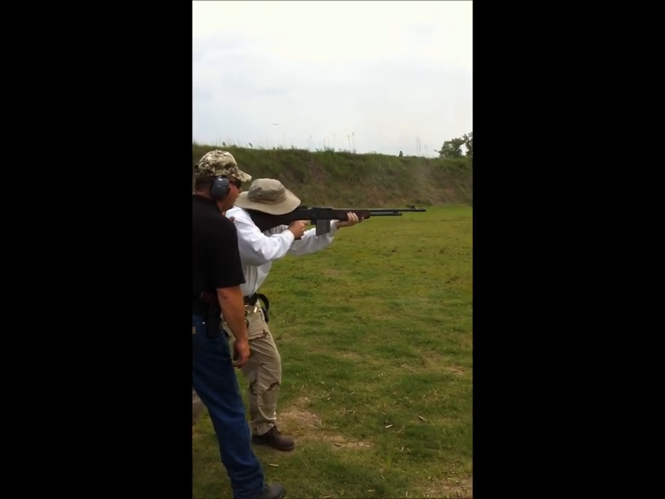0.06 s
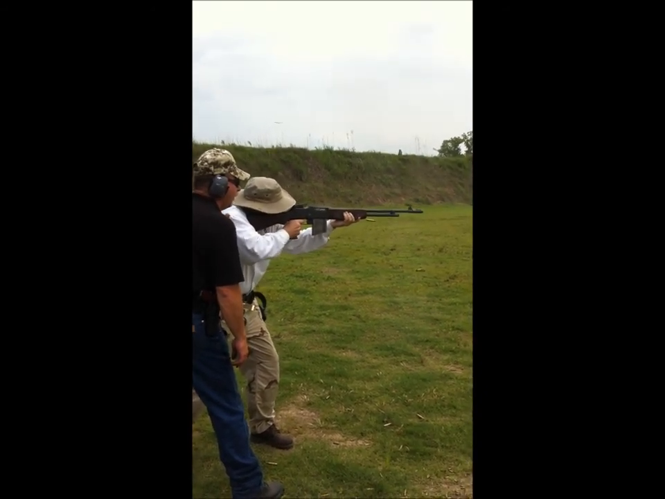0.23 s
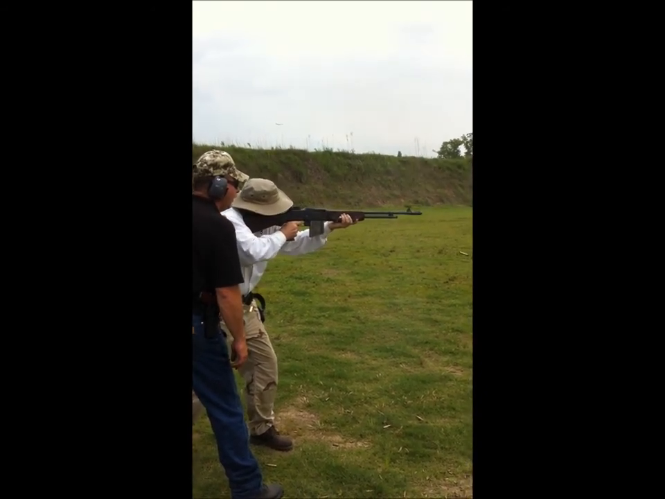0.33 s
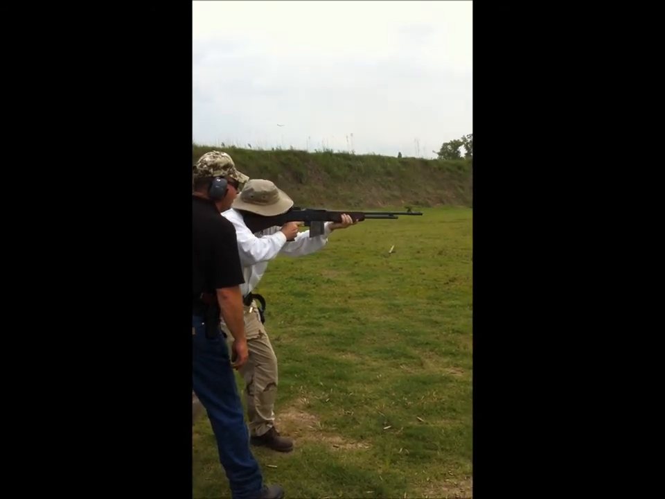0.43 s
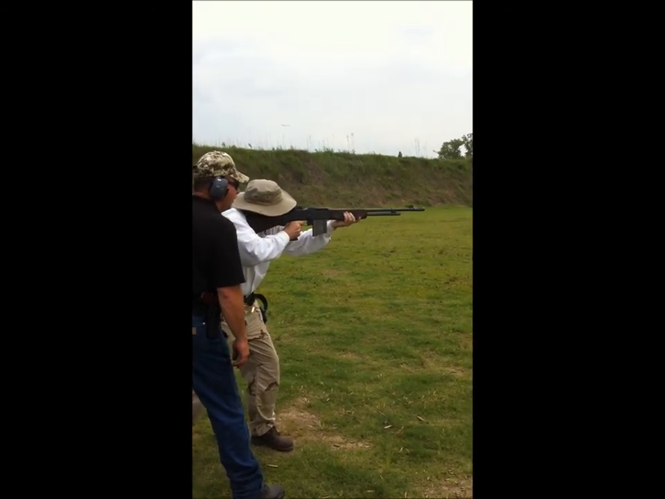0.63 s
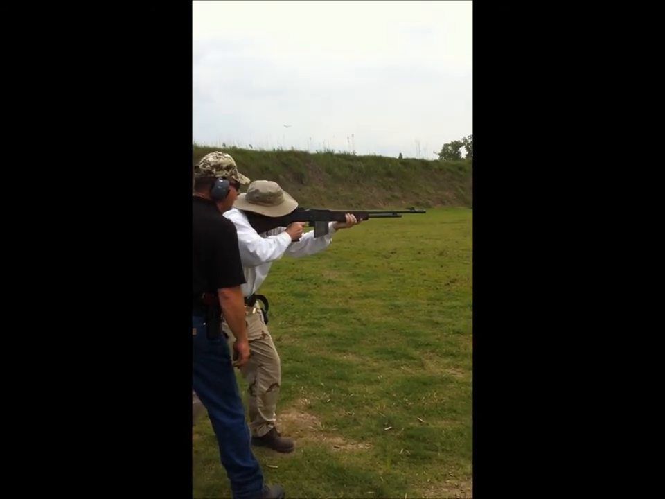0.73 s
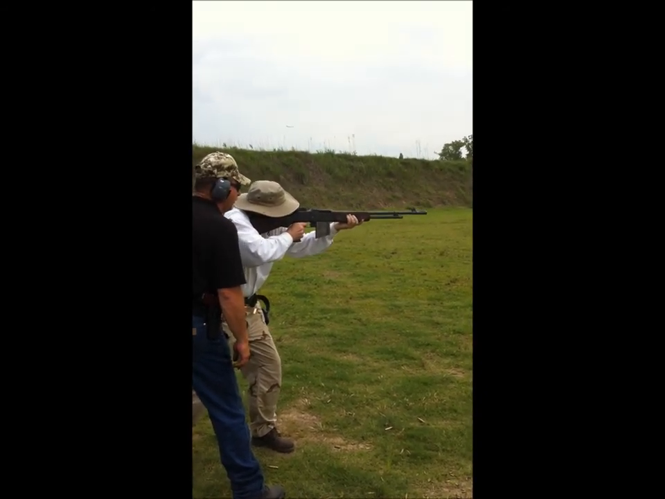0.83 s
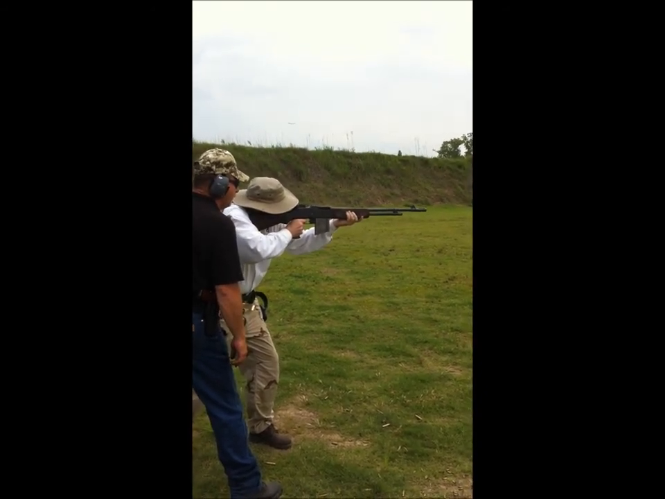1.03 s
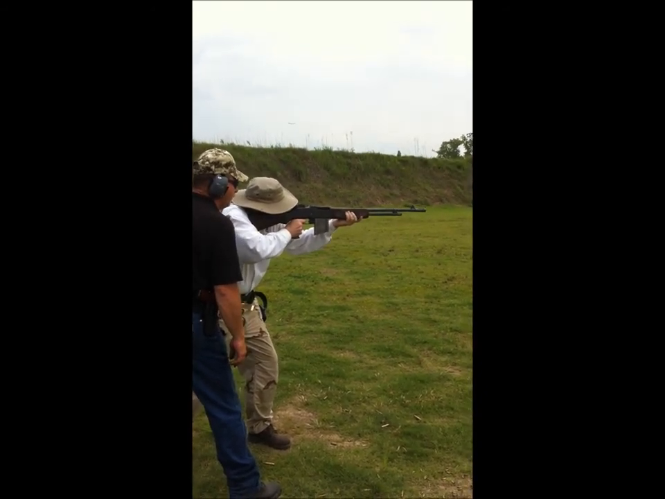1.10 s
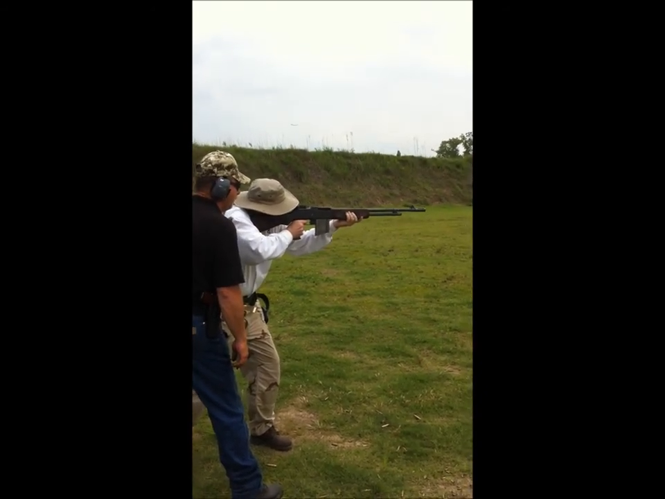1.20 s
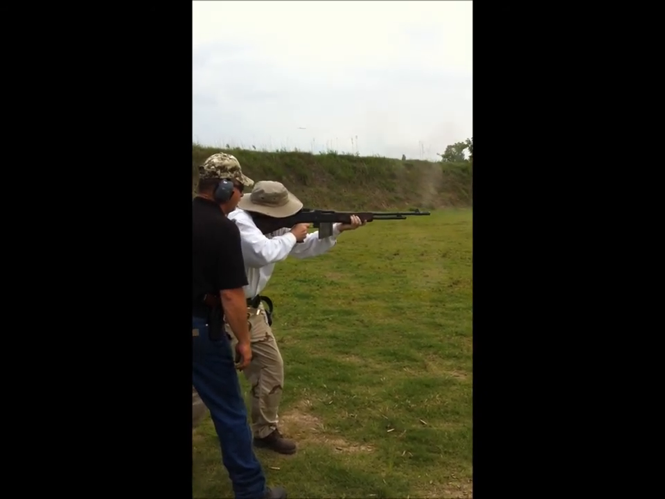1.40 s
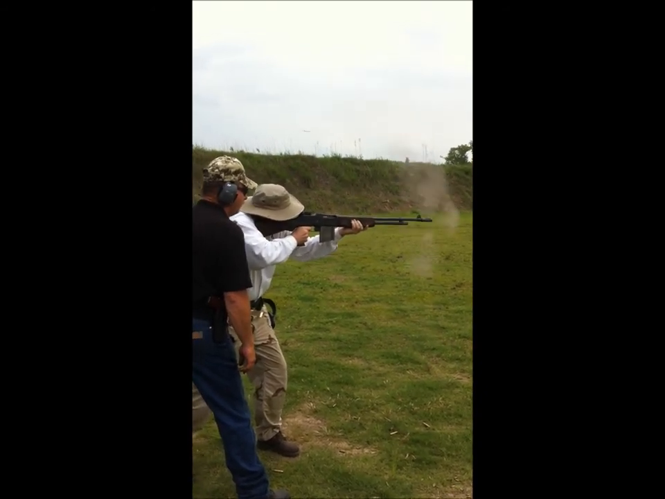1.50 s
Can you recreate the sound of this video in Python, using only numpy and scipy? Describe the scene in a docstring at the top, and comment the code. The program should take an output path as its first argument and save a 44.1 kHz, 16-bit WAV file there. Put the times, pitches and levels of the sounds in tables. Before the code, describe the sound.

Three-round burst of automatic rifle fire close by, echoing off earth berms on open grass

```python
"""Three hard rifle blasts in a quick burst on an open grass range closed by earth berms, a few metres away, in mono.
The action rattles first; close echoes and rough scatter trail every blast, and far echoes roll in late and dull.
Near the end a spent case rings and the action moves again, over a faint unsteady floor of air.
Blasts, echoes and thuds are decaying swings, rattles and knocks are dying bands of noise, the case is two
beating sines, and the scatter is grains, hiss and rumble. A fast limiter ducks whatever is too loud."""
import sys
import numpy as np
from scipy import signal
from scipy.fft import rfft, irfft
from scipy.io import wavfile

SR = 44100
rng = np.random.default_rng(int(sys.argv[2]) if len(sys.argv) > 2 else 0)


def gain_from_decibels(decibels):
    """Convert decibel values to linear amplitude factors."""
    exponent = np.asarray(decibels, float) / 20
    return 10 ** exponent


def bounce(signal):
    """Save signal as a 16-bit WAV file at the path given by the first command-line argument."""
    frames = np.transpose(np.atleast_2d(signal))
    limited = np.clip(frames, -1, 1)
    pcm = np.round(limited * 32767).astype(np.int16)
    wavfile.write(sys.argv[1], SR, pcm)


N = 68355
T = np.arange(N) / SR   # seconds
FLICKER_DB = 3   # spread of the chance swings in level

# All levels are those ahead of the limiter.
# Spectrum of the air floor. Each row: frequency in Hz, relative level in dB per Hz.
AIR_SPECTRUM = [(18, -73), (30, -30), (183, -1), (301, -7.5), (423, -18), (610, -6), (952, -12),
                (1060, -15.5), (2860, -20), (15700, -38)]
# Rough scatter from ground and berms after every shot.
# Each row: delay in seconds, dull grains in dB, bright hiss in dB, rumble in dB.
SCATTER = [(.012, -27, -34, -52), (.02, -18.5, -22, -37), (.031, -11, -16, -29), (.042, -15, -19.5, -21),
           (.05, -26.5, -23.5, -37), (.065, -22, -25.5, -31), (.08, -16.5, -18.5, -29.5),
           (.1, -25, -23.5, -26), (.17, -31.5, -26.5, -33.5), (0.281, -32.5, -27, -28),
           (0.311, -44, -32.5, -33), (.35, -49, -39, -46.5), (.52, -77, -58.5, -49.5),
           (.545, -60, -48, -46), (.56, -69, -43, -50), (.62, -65, -53.5, -52.5), (.67, -72, -54, -50),
           (.69, -57, -45, -63), (.76, -63, -62.5, -63), (1.2, -61, -80, -70.5)]
# Spectrum of the dull grains. Each row: frequency in Hz, relative level in dB per Hz.
DULL_SPECTRUM = [(60, -54), (130, -15), (267, -2), (600, -5), (1210, -7.5), (1880, -10), (2720, -19),
                 (4000, -21), (8000, -65)]
# Spectrum of the bright hiss. Each row: frequency in Hz, relative level in dB per Hz.
BRIGHT_SPECTRUM = [(710, -41), (1200, -2), (1380, -16), (2080, -3.5), (2520, -5), (3090, -5.5),
                   (9670, -7.5), (15700, -11)]
# Low thuds about the range.
# Each row: start in seconds, level in dB before the low-pass, ring in Hz, 60 dB decay in seconds.
THUDS = [(1.328, -34, 147, 0.092), (1.437, -35, 150, 0.059), (1.54, -36, 60, 0.093)]
# Hollow knocks about the range.
# Each row: start in seconds, level in dB (noise rms starts 6 dB lower), centre in Hz, 60 dB decay in seconds.
KNOCKS = [(.19, -26.5, 660, 0.16), (.733, -16, 697, 0.095), (1.131, -29, 760, 0.017),
          (1.137, -36, 700, 0.26)]
# Metal clatter of action and cases.
# Each row: start in seconds, level in dB (noise rms starts 6 dB lower), centre in Hz, 60 dB decay in seconds.
CLATTER = [(0.032, -38, 6900, 0.049), (.162, -22, 5800, 0.12), (.169, -22, 8000, 0.044),
           (0.179, -16.5, 3700, 0.065), (0.199, -8, 10600, 0.0078), (0.2078, -10.5, 6000, .03),
           (.213, -15, 4730, 0.042), (.228, -1, 9100, 0.027), (0.357, -0.5, 1200, 0.0065),
           (.462, -12, 1500, .006), (0.58, -7, 3120, 0.024), (0.6193, 2.5, 5170, 0.006),
           (0.625, -10, 4850, .02), (0.653, -10, 2380, 0.054), (0.671, -11, 2120, 0.048),
           (.688, -19, 2400, 0.065), (1.052, -49, 6000, 0.037), (1.265, -40.5, 7960, 0.054),
           (1.329, -40, 3000, 0.045), (1.41, -45.5, 6000, 0.061), (1.438, -37.5, 2470, 0.03),
           (1.482, -28, 7000, 0.04), (1.507, -34, 4990, 0.037), (1.518, -25, 4750, 0.19),
           (1.536, -17, 5900, 0.092)]
# Modes of the spent case. Each row: frequency in Hz, level in dB before a 1 dB cut, 60 dB decay in seconds.
CASE_MODES = [(9539, -22, .35), (9572, -20, .07)]
# The burst. Each row: blast in seconds, blast level in dB before the low-pass,
# lead of the action's hiss in seconds, hiss level in dB.
SHOTS = [(0.2369, 12, 0.012, -19.5), (0.3468, 10.5, 0.0022, -4.5), (0.4526, 17.5, 0.0018, -10)]
# Distinct echoes of every shot. Each row: delay in seconds, level in dB before the low-pass,
# ring in Hz, 60 dB decay in seconds, direction of the first swing (+1 or -1).
ECHOES = [(0.015, 1.5, 242, 0.014, 1), (0.0349, 3, 440, 0.0061, -1), (0.0383, -4.5, 287, 0.011, 1),
          (0.0417, -12, 404, 0.018, 1), (.27, -16, 205.4, 0.066, 1)]


def rms_one(x):
    """Scale to rms 1."""
    return x / np.sqrt(np.mean(x ** 2) + 1e-20)


def coloured(x, points):
    """Weight the spectrum of x by the points, joined on a log frequency axis; rms 1."""
    hz, db = np.transpose(points)
    f = np.arange(len(x) // 2 + 1) * SR / len(x) + 1
    gain = gain_from_decibels(np.interp(np.log(f), np.log(hz), db))
    return rms_one(irfft(rfft(x) * gain, len(x)))


def filtered(x, order, hz, kind="low"):
    """Butterworth filter."""
    return signal.sosfilt(signal.butter(order, hz, kind, fs=SR, output="sos"), x)


def flicker(per_s):
    """Level swings in dB: chance values drawn per_s times a second, joined by straight lines."""
    values = rng.standard_normal(int(N / SR * 400))   # more than any rate here uses
    return FLICKER_DB * np.interp(T * per_s, np.arange(len(values)), values)


def thump(s, db, hz, t60, cut_hz):
    """A pressure jump that swings back and dies, its edges rounded by a low-pass."""
    t = np.maximum(T - s, 0)
    swing = (T >= s) * np.cos(2 * np.pi * hz * t) * gain_from_decibels(db - 60 * t / t60)
    return filtered(swing, 2, cut_hz)


def burst(s, db, hz, t60, width):
    """Banded noise that starts at once and dies; width is the ratio of band edges to centre."""
    edges = np.clip([hz / width, hz * width], 20, .45 * SR)
    noise = rms_one(filtered(rng.standard_normal(N), 2, edges, "band"))
    return .5 * noise * (T >= s) * gain_from_decibels(db - 60 * np.maximum(T - s, 0) / t60)


def air():
    """Faint coloured noise whose level wavers by chance."""
    return gain_from_decibels(-48.5 + flicker(25.27)) * coloured(rng.standard_normal(N), AIR_SPECTRUM)


def scatter():
    """Many small faces return each blast: shared dull grains, hiss that darkens with distance, rumble."""
    grains_per_s, grain_spread_db = 2500, 4.5
    far_s, far_cut_hz = 0.38, 4240   # returns later than far_s are fully dulled
    delay, dull_db, bright_db, rumble_db = np.transpose(SCATTER)

    def level(db):
        return np.interp(T, delay, db, left=-200)   # silent ahead of the first return

    hits = rng.random(N) < grains_per_s / SR
    size = gain_from_decibels(grain_spread_db * np.minimum(rng.exponential(1, N), 4))
    grains = hits * size * rng.choice([-1, 1], N)
    dull = coloured(grains, DULL_SPECTRUM) * gain_from_decibels(level(dull_db) + flicker(59.7))
    far = np.clip(T / far_s, 0, 1) ** 2
    out = np.zeros(N)
    for s, *_ in SHOTS:
        start = int(s * SR)
        near_hiss = coloured(rng.standard_normal(N), BRIGHT_SPECTRUM)
        far_hiss = filtered(near_hiss, 1, far_cut_hz)
        hiss = (1 - far) * near_hiss + far * far_hiss
        hiss = hiss * gain_from_decibels(level(bright_db) + flicker(151.4))
        rumble = rms_one(filtered(rng.standard_normal(N), 2, (149, 339), "band"))
        rumble = rumble * gain_from_decibels(level(rumble_db))
        out[start:] += (dull + hiss + rumble)[:N - start]
    return out


def thuds():
    """Low blows: short decaying swings with little treble."""
    return sum(thump(*row, cut_hz=610) for row in THUDS)


def knocks():
    """Hollow knocks: noise in a narrow band, dying away."""
    return sum(burst(*row, width=1.194) for row in KNOCKS)


def clatter():
    """Metal parts rattle: wide bands of noise, each starting at once and dying."""
    return sum(burst(*row, width=2.28) for row in CLATTER)


def spent_case():
    """Two close high modes struck once, beating as they ring down."""
    t = np.maximum(T - 1.481, 0)   # struck at 1.481 s
    return sum(gain_from_decibels(-1 + db - 60 * t / t60) * np.sin(2 * np.pi * hz * t) for hz, db, t60 in CASE_MODES)


def action_hiss(s, lead, db):
    """Bright steady noise of the action, cut off as the blast begins."""
    # the spectrum is flat below its fourth point
    return gain_from_decibels(db) * coloured(rng.standard_normal(N), BRIGHT_SPECTRUM[3:]) * (T > s - lead) * (T < s)


def blast(s, db):
    """A pressure jump that swings down first, with a wide burst of hiss."""
    jump = -thump(s, db, hz=250, t60=0.01, cut_hz=2400)
    hiss = burst(s, 3, 4100, 0.02, 5.5)
    return jump + hiss


def sputter(s):
    """Sharp one-sided spikes of chance size just after the blast, slightly smoothed."""
    spikes_per_s, length_s = 720, .0075
    hits = (rng.random(N) < spikes_per_s / SR) * (T > s) * (T < s + length_s)
    return gain_from_decibels(8) * signal.lfilter([1], [1, -.6], hits * rng.random(N))


def midrange_patch(s):
    """A brief patch of midrange noise just ahead of the second echo."""
    start, length_s = s + .0275, 0.0064
    return burst(start, -9, 1640, 1, 1.32) * (T < start + length_s)


def echoes(s):
    """Distinct returns of one blast, each a decaying swing up or down with rounded edges."""
    return sum(swing * thump(s + delay, db, hz, t60, cut_hz=3000) for delay, db, hz, t60, swing in ECHOES)


def shots():
    """Each round: hiss of the action, blast, sputter, a patch of midrange noise, then the echoes."""
    out = np.zeros(N)
    for s, db, lead, hiss_db in SHOTS:
        out += action_hiss(s, lead, hiss_db)
        out += blast(s, db)
        out += sputter(s)
        out += midrange_patch(s)
        out += echoes(s)
    return out


def scene():
    """All sources reach one capsule, carried alike on both channels."""
    mono = air() + scatter() + thuds() + knocks() + clatter() + spent_case() + shots()
    return np.array([mono, mono])


def limiter(x):
    """Gain drops fast where the peaks pass the ceiling, then recovers at a steady rate in dB."""
    ceiling_db, release_db_per_s, attack_s = -0.5, 1498, 0.00024
    over = np.maximum(20 * np.log10(np.abs(x[0]) + 1e-9) - ceiling_db, 0)
    recovery = release_db_per_s * T
    held = np.maximum.accumulate(over + recovery) - recovery
    r = np.exp(-1 / (attack_s * SR))
    cut_db = signal.lfilter([1 - r], [1, -r], held)
    return x * gain_from_decibels(-cut_db)


def top_cut(x):
    """Nothing passes above the cut-off."""
    return signal.sosfilt(signal.butter(12, 15850, fs=SR, output="sos"), x)


def record(dry):
    """Limiter, hard clip, bass cut, second clip, and a steep low-pass."""
    x = np.clip(limiter(dry), -1.1, 1.1)
    x = filtered(x, 2, 77, "high")
    x = np.clip(x, -1, 1)
    # 50 dB down from 16 kHz up
    mix = signal.sosfilt(signal.cheby2(10, 50, 16000, fs=SR, output="sos"), x)
    return top_cut(mix)


dry = scene()
out = record(dry)
bounce(out)
```